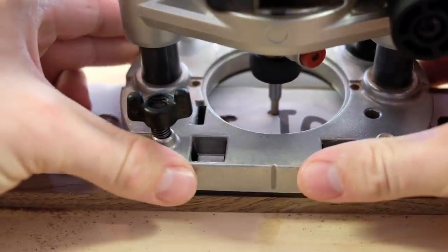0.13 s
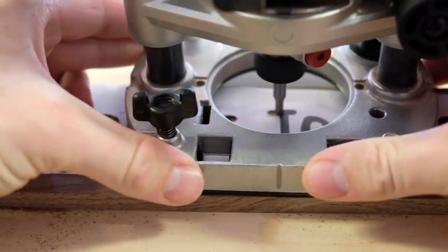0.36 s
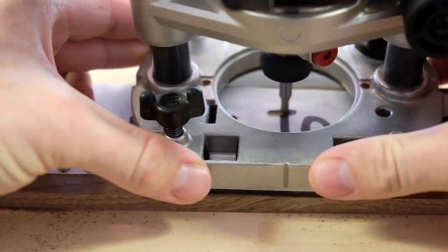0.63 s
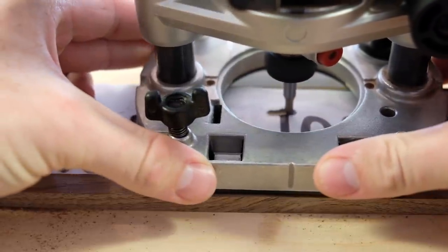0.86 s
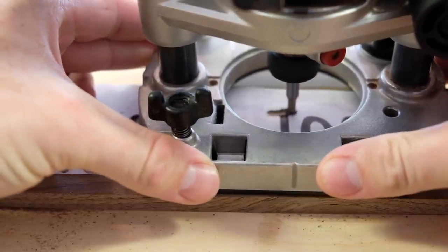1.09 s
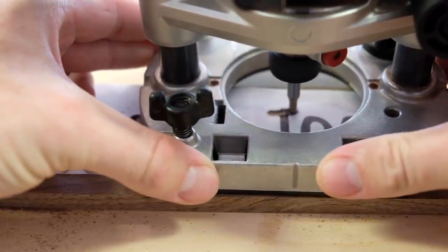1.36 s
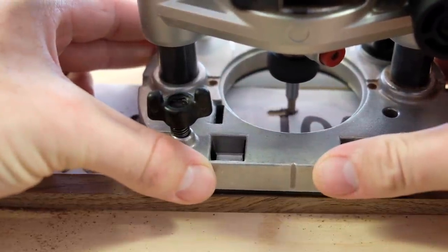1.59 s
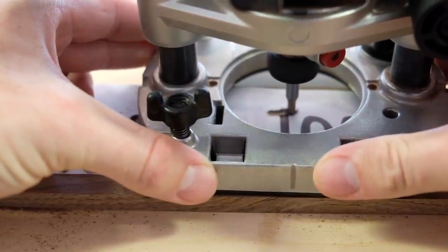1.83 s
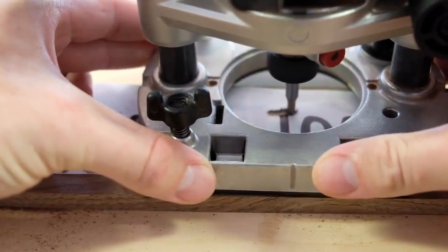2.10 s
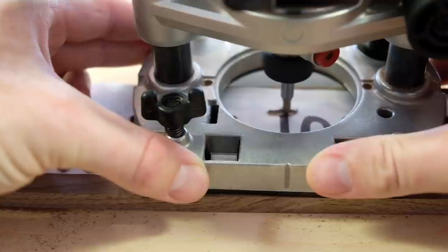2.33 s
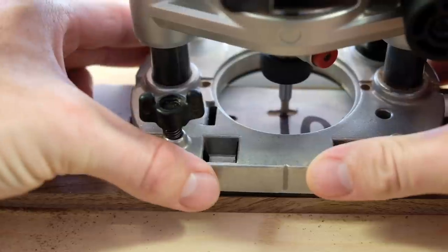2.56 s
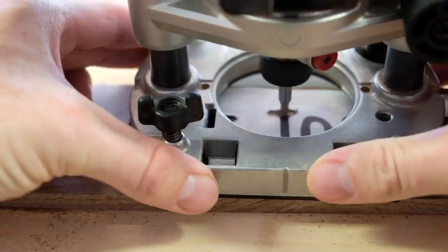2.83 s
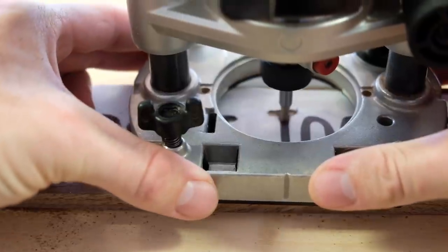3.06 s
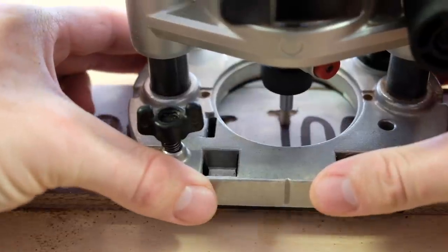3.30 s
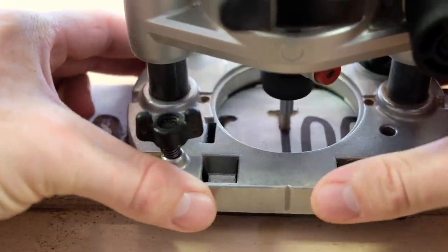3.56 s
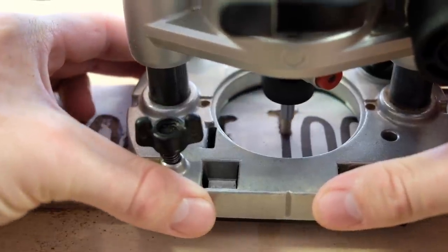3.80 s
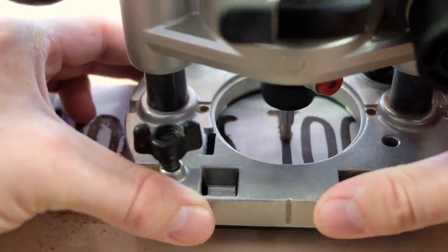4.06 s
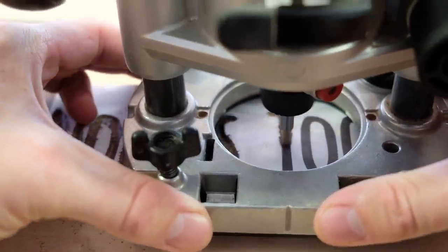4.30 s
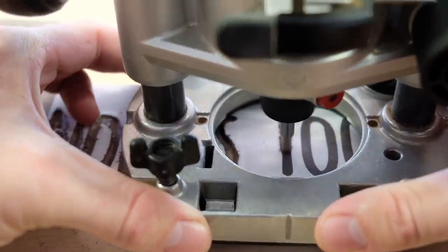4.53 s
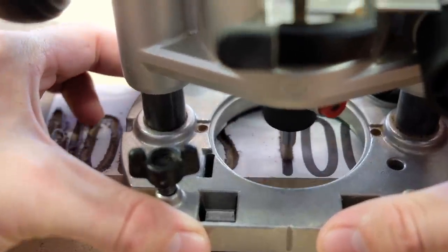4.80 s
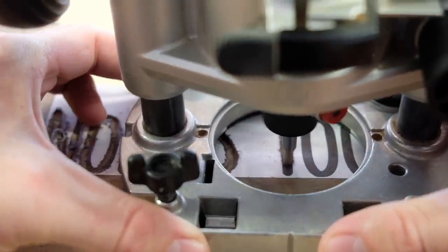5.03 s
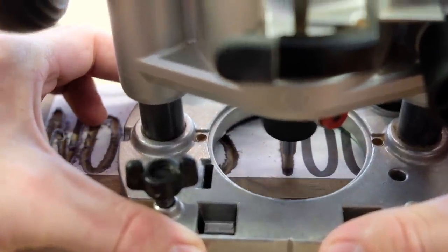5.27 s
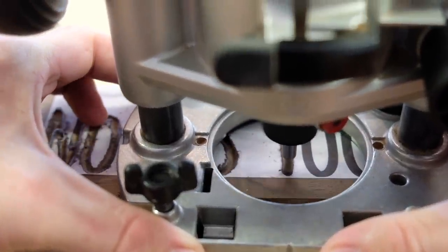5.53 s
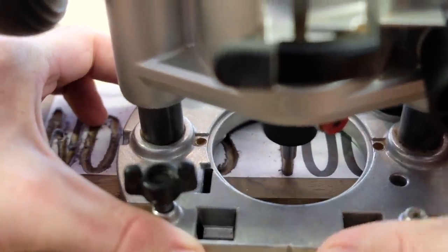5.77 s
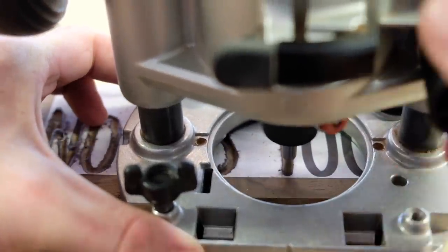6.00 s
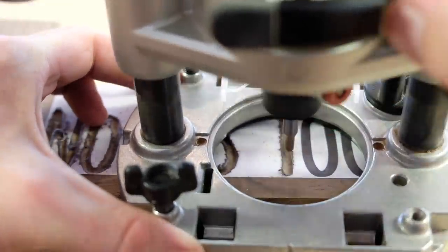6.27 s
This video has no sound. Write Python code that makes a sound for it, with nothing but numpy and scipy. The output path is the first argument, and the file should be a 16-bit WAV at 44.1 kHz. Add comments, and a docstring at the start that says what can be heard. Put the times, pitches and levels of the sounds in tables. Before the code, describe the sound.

High, buzzing electric router whine swells from near silence, holds a constant pitch with flickering rasp and airy hiss, then two dull bumps near the end.

```python
"""At a workbench, a small router carves letters into a board close to one microphone, fading in over a room hum.
The spinning shaft sings a stack of whole-number multiples of its speed, called orders.
A bearing and the mains add thin side tones; filtered noise makes the hiss of fan air and chips, puffing each turn.
The colour shifts as the tool slides along, and the bench shakes with a low rumble.
At the end the motor is lifted on its posts with two soft knocks, each a pair of dying sines."""
import sys
import numpy as np
from scipy import signal
from scipy.fft import irfft
from scipy.io import wavfile
from scipy.ndimage import uniform_filter1d

SR = 44100
rng = np.random.default_rng(int(sys.argv[2]) if len(sys.argv) > 2 else 0)


def volts_from_decibels(level):
    """Turn decibel levels (scalar or array-like) into linear amplitude factors."""
    exponent = np.asarray(level, float) / 20
    return 10 ** exponent


def dump_mix(stems):
    """Bounce the given channels to the path in sys.argv[1] as a 16-bit WAV at rate SR."""
    frames = np.atleast_2d(stems).T  # one column per channel
    limited = np.clip(frames, -1, 1)  # hard clip at full scale
    pcm = np.round(limited * 32767).astype(np.int16)
    wavfile.write(sys.argv[1], SR, pcm)


N = 281358  # length in samples
TIME = np.arange(N) / SR  # seconds


def evened(x):
    """Scales a signal to an rms of 1."""
    return x / np.sqrt(np.mean(abs(x) ** 2) + 1e-20)


def curve(rows, t):
    """Reads each column of a time table at times t, with straight lines between rows."""
    s, *columns = np.transpose(rows)
    return [np.interp(t, s, c) for c in columns]


def read(points, hz):
    """Reads a spectrum table at the frequencies hz, on a log-frequency axis."""
    f, value = np.transpose(points)
    return np.interp(np.log(hz + 1), np.log(f + 1), value)


def span(s, length, edge):
    """0 before, 1 during and 0 after a stretch of time, with soft edges."""
    to_nearest_end = np.minimum(TIME - s, s + length - TIME)
    return np.clip(to_nearest_end / edge + .5, 0, 1)


def wander(width_hz):
    """Slow random drift: low-passed complex noise of rms 1, drawn coarsely and interpolated."""
    step = 32  # samples between draws
    a, b = rng.standard_normal((2, N // step + 200))
    r = np.exp(-np.pi * abs(width_hz) * step / SR)
    smooth = signal.lfilter([1], [1, -r], a + 1j * b)
    z = evened(smooth[199:])  # skip the filter's start-up
    at = np.arange(len(z)) * step / SR
    return np.interp(TIME, at, z.real) + 1j * np.interp(TIME, at, z.imag)


def tone(turns, db, slow=.3, skirt=.3, firm_db=0):
    """A sine that drifts slowly and shivers fast, which gives it a noisy foot; firm_db lifts its clean core."""
    shape = volts_from_decibels(firm_db) + slow * wander(width_hz=19) + skirt * wander(width_hz=55)
    size = np.sqrt(2 / (1 + slow ** 2 + skirt ** 2))
    spin = np.exp(2j * np.pi * (turns + rng.random()))
    return size * volts_from_decibels(db) * (shape * spin).real


# Hums of the room. Each row: pitch in Hz, width in Hz, starting level in dB, fall in dB per second.
ROOM_HUM = [(115.7, 7, -72, 5), (495, 0.91, -71, 52), (39.6, 23, -75, 5), (300, 250, -84, 5),
            (900, 500, -77, 5)]


def room_tone():
    """A low hum and a quickly fading note near 495 Hz, made of wandering tones, that stop short."""
    end_s, fade_s = 0.23, 0.025
    hum = np.zeros(N)
    for hz, width_hz, db, fall_db in ROOM_HUM:
        spin = np.exp(2j * np.pi * hz * TIME)
        # a narrow tone is mostly steady, a wide one mostly drift
        drift = evened(12 / width_hz + wander(width_hz))
        hum += np.sqrt(2) * volts_from_decibels(db - fall_db * TIME) * (spin * drift).real
    return hum * np.clip((end_s - TIME) / fade_s, 0, 1)


# The shaft's orders. Each row: order, level in dB against the other router sounds,
# roughness (share of shiver around the line, scaled below).
ORDERS = [(1, -59.5, .1), (2, -63.5, .2), (3, -65, .25), (4, -59.5, .3), (5, -53.3, .32), (6, -59.5, .35),
          (7, -58, .4), (8, -60, .4), (9, -62.5, .6), (10, -63.5, .8), (11, -69, 1.2), (12, -67, .5),
          (13, -71, .6), (14, -75, .6), (15, -68.5, .5), (16, -68.5, .7), (17, -67, 1.6), (18, -65.5, 2.2),
          (19, -70, 2.3), (20, -73, 2.2), (21, -78, 1.5), (22, -77, 1.2), (23, -74, 1.6), (24, -65.5, .5)]
# The bit chatters and a group of orders flares or drops out at once.
# Each row: start in seconds, length in seconds, centre order, spread in orders, strength in dB before scaling.
CHATTER = [(0, .17, 17.9, 1, 13), (0.186, .06, 17.9, 1, 14), (0.296, .14, 17.9, 1, 12),
           (0.51, 0.25, 18.4, 1.1, 12.5), (.15, 0.96, 22, 1.6, 7), (0.874, 0.23, 17.3, 1.1, 13.5),
           (2.38, 0.33, 17.5, 1.2, 6), (2.678, 1.0, 18.3, 1.3, 9), (3.2, 0.083, 5.5, 1, -4),
           (3.211, 0.059, 11.5, 1.5, 8.5), (3.365, .08, 11, 1, 9), (3.386, 0.034, 5.5, 1, -9.5),
           (4.301, 1.2, 15.4, .7, 5), (5.42, .09, 20, 2.4, 8), (5.5, 0.28, 17.5, .8, 8),
           (5.53, 0.074, 12, 1.3, 9.5), (5.52, .2, 21.3, 1.8, 12), (5.88, .45, 14, .5, 9)]
# One order sings out or sinks into the hiss for a while.
# Each row: start in seconds, length in seconds, order, change in dB before scaling.
SWELLS = [(0.127, 1.18, 2, 4.5), (1.5, 0.27, 2, -17), (2.18, 0.18, 2, -11), (2.747, 0.96, 2, -7.5),
          (5.498, 0.86, 2, 3), (5.85, 0.27, 2, 3), (.3, 0.23, 3, 6), (.6, 0.67, 3, -15), (1.2, 2.8, 3, -2),
          (3.78, 1.42, 3, 7.5), (5.457, 0.27, 3, 7), (0, 1.32, 4, 3), (0.304, 0.53, 4, 2),
          (1.5, 0.11, 4, -6), (1.8, .6, 4, 0.5), (2.42, 0.31, 4, 3), (2.982, 0.46, 4, 4),
          (4.85, .65, 4, -8.5), (5.804, .3, 4, 3), (0.197, 0.18, 5, -25), (.68, 0.16, 5, -14),
          (1.066, 0.23, 5, 1.5), (1.355, 0.25, 5, -3.5), (1.813, 0.38, 5, -6), (2.18, 0.21, 5, 3),
          (2.42, 0.29, 5, -5), (3.11, .4, 5, 4.5), (4.837, 0.15, 5, -4), (4.994, 0.26, 5, 2),
          (5.25, 0.11, 5, -5), (5.37, .22, 5, 3.5), (5.882, 0.23, 5, -1), (1.05, 1.1, 6, -4),
          (1.8, .32, 6, -3), (2.4, .16, 6, -11), (2.76, 2.1, 6, 5), (3.1, 0.34, 6, 4), (4.983, 0.16, 6, 6),
          (5.747, .63, 6, -15), (0, 2.4, 7, -12), (2.406, 0.77, 7, -2.5), (3.143, .25, 7, 3.5),
          (3.736, 2.0, 7, 3.5), (4.148, 0.8, 7, 2), (5.2, .17, 7, -4), (5.746, .13, 7, -12),
          (5.88, 0.12, 7, 3.5), (.15, 1.09, 8, -7), (2.25, 0.42, 8, -2), (4.95, 1.1, 8, 1.5),
          (5.85, .3, 8, 3.5), (.3, 0.77, 9, 4.5), (3.9, 0.6, 9, -5), (5.72, .6, 9, 3.5), (.6, 0.2, 10, 6),
          (3.15, .75, 10, 4), (4.65, .8, 10, -3), (4.35, 1, 12, 0), (4.35, 0.86, 13, 6),
          (1.35, 0.38, 17, 1), (3.45, 0.44, 17, -8), (4.95, 1.0, 24, -5), (5.3, .6, 16, 0)]
# The bit twists and slips against the shaft. Each row: time in seconds, mean slip in Hz, rms wobble in Hz,
# both per order, and reduced for orders of roughness under 1.
SLIP = [(0, -0.701, .5), (.8, -0.498, 0.49), (.88, -0.033, .15), (1.2, -0.003, 0.26), (2.3, -.3, 1),
        (3.7, -.3, 0.92), (3.9, 0, 0.4), (5.36, 0, 0.53), (5.42, -0.91, 0.81), (5.66, -0.88, .7),
        (5.72, -0.014, 0.44), (6.38, 0.022, 0.36)]
# Orders that stay with the shaft and do not slip: a plain list of order numbers.
ARMATURE_ORDERS = (1, 12, 15, 16, 24)


def orders(turns):
    """Shaft orders: high ones flutter together, chatter makes them ring firm, rough ones follow the slipping bit."""
    # slow level changes in dB, one line per order; later scaled for loudness and for the clean core
    load_db = np.zeros((len(ORDERS) + 1, N))
    for s, length, order, db in SWELLS:
        load_db[round(order)] += db * span(s, length, edge=0.023)
    # the bit leaves the wood at 6.08 s and orders 4 to 8 fall away over 0.12 s
    load_db[4:9] += -15 * np.clip((TIME - 6.08) / 0.12, 0, 1)
    # orders 2 to 8 waver each on their own, 9 to 23 flutter together
    load_db[2:9] += [1.27 * wander(width_hz=2.8).real for _ in range(2, 9)]
    load_db[9:24] += 2.3 * wander(width_hz=8.2).real

    slip_hz, wobble_hz = curve(SLIP, TIME)
    wobble = wobble_hz * np.sqrt(2) * wander(width_hz=25.2).real
    lag = np.cumsum(slip_hz + wobble) / SR  # in turns

    flares = [signal.windows.tukey(round(length * SR), .15) for _, length, *_ in CHATTER]
    out = np.zeros(N)
    for k, (_, db, rough) in enumerate(ORDERS, 1):
        flare_db = np.zeros(N)
        for (s, _, centre, spread, lift_db), flare in zip(CHATTER, flares):
            nearness = np.exp(-((k - centre) / spread) ** 2 / 2)
            flare_db[round(s * SR):][:len(flare)] += lift_db * nearness * flare
        slips = k not in ARMATURE_ORDERS
        order_turns = k * (turns + slips * min(rough, 1) * lag)
        level_db = db + 0.62 * load_db[k] + 0.57 * flare_db
        firm_db = 0.77 * flare_db + .45 * load_db[k]
        slow = (.3 if k <= 8 else .6) * rough
        out += tone(order_turns, level_db, slow, 0.88 * rough, firm_db)
    return out


# Bearing tones: alone, doubled or tripled, and beating with the shaft. Each row: times the bearing,
# times the shaft, level in dB against the other router sounds, dB gained along the stroke.
BEARING = [(1, 0, -61.5, -4), (1, 2, -70.5, 2), (1, 3, -67, 6), (1, 4, -71, 0), (2, 0, -66, -2),
           (2, 2, -72, 0), (3, 0, -76, 0)]
# Mains pulses split the armature slot tones.
# Each row: shaft order, offset in Hz, level in dB against the other router sounds.
SLOT_SIDES = [(12, -720, -68), (12, -480, -67), (12, -240, -69), (12, 240, -74), (24, -480, -78),
              (24, -240, -79)]
# How the tool is held, for the bearing and the hiss.
# Each row: time in seconds, way along the stroke from 0 to 1, lift from 0 to 1.
POSE = [(0, 0.8, 0.2), (1, 0.64, 0.06), (2.4, 0, 0.3), (3.2, 0.8, 0.05), (3.6, 0.8, 0.02), (4.6, 1, 0.13),
        (5.7, 1, 0.37), (5.85, 1, 0.36), (6.1, .9, 0.86), (6.38, .9, 1)]


def side_tones(turns):
    """Bearing and mains lines, thin tones that are locked to the shaft or offset from it."""
    bearing_per_turn = 4.098
    way = curve(POSE, TIME)[0]
    out = np.zeros(N)
    for m, n, db, gain_db in BEARING:
        out += tone((m * bearing_per_turn + n) * turns, db + gain_db * way, 0.86, 0.17)
    for k, hz, db in SLOT_SIDES:
        out += tone(k * turns + hz * TIME, db, 1.0, 0.1)
    return out


# Colour of the air and chip noise; only the shape counts.
# Each row: pitch in Hz, dB early in the stroke, dB late in the stroke, dB when lifted.
HISS = [(150, -29, -30, -26), (320, -27, -27, -23), (570, -22.5, -22.5, -19), (800, -8.5, -12.5, -10),
        (1150, -12.5, -13.5, -12), (1700, -3.5, -5.5, -2), (2250, -1, -4, -2), (3500, -4.5, -4, -3),
        (4250, -8.5, -11, -7), (5500, -10.5, -9.5, -5), (6200, -6.5, -8, -4), (7400, -8.5, -14, -13),
        (8800, -21, -16, -13), (10100, -10, -14, -11), (12000, -13.3, -13.5, -14),
        (13800, -14, -15.5, -14.5), (15700, -13.5, -14, -13.5)]
# Cavity of the base plate over the board: peaks and echo dips that fade on lifting.
# Each row: pitch in Hz, width in Hz, height in dB.
CAVITY = [(1900, 77, 2.5), (2500, 150, 3), (2850, 85, -10.5), (3206, 154, 6), (4740, 220, -2.5),
          (5180, 59, 7.5), (6520, 290, 2.5)]
# A treble echo dip opens as the motor rises and slides down in pitch.
# Each row: time in seconds, pitch in Hz, depth in dB.
HOLLOW = [(5.68, 13700, 0), (5.76, 13500, -6), (6.05, 13500, -7), (6.2, 13200, -7), (6.38, 12800, -7)]


def hiss(turns):
    """Fan air and chips: noise coloured by the pose, the treble puffing once and twice a turn."""
    # the noise is built as a spectrogram, one frame every 256 samples
    frames, hz = N // 256 + 5, np.fft.rfftfreq(1024, 1 / SR)
    a, b, patches = rng.standard_normal((frames, 513, 3)).T
    t = np.arange(frames) * 256 / SR
    hz_column = hz[:, None]

    way, lift = np.clip(curve(POSE, t), 0, 1)
    f, *columns = np.transpose(HISS)
    early, late, lifted = (read(np.c_[f, c], hz)[:, None] for c in columns)
    cavity = sum(db * np.exp(-((hz - f) / w) ** 2 / 2) for f, w, db in CAVITY)[:, None]
    on_board = (1 - way) * early + way * late + cavity
    colour_db = (1 - lift) * on_board + lift * lifted
    hollow_hz, hollow_db = curve(HOLLOW, t)
    colour_db += hollow_db * np.exp(-((hz_column - hollow_hz) / 420) ** 2 / 2)

    # uneven patches over pitch and time, and gusts that grow towards the treble
    patches = evened(uniform_filter1d(uniform_filter1d(patches, 40, 0), 16, 1))
    gusts = evened(uniform_filter1d(rng.standard_normal(frames), 14))
    gusts_db = .7 * gusts * np.clip(hz_column / 9000, 0, 1)
    z = (a + 1j * b) * volts_from_decibels(colour_db + .6 * patches + gusts_db)
    z *= np.clip(hz_column / 130, 0, 1) ** 2  # thin out the bass
    air = evened(signal.istft(z, nperseg=1024, noverlap=768)[1][:N])

    high_pass = signal.butter(2, 4000, "high", fs=SR, output="sos")
    treble = signal.sosfilt(high_pass, air)
    puff = .33 * np.cos(2 * np.pi * turns) + .15 * np.cos(4 * np.pi * turns)
    return volts_from_decibels(-46.0) * (air + puff * treble)


# Colour of the low shaking; only the shape counts. Each row: pitch in Hz, level in dB.
RUMBLE = [(10, -11), (22, -5.5), (45, -14.5), (90, -18.5), (150, -24.5), (300, -36)]
# The hands nudge the tool and the bench shakes.
# Each row: start in seconds, length in seconds, dB above the steady shaking.
BUMPS = [(.97, 0.28, 7), (1.45, 0.48, 8), (2.52, .14, 8), (2.695, .1, 8), (2.88, .18, 11), (3.22, 0.22, 8),
         (3.55, .6, 8.5), (3.92, 0.11, 5), (4.92, .15, 8), (5.08, 0.1, 13), (5.25, .7, 4), (6.255, .12, 14)]
# Loudness of the whole router, which the rumble follows too. Each row: time in seconds, rms level in dB.
FADE = [(0.0, -65.5), (0.41, -53), (0.78, -46.5), (1.17, -42.5), (3.43, -43), (3.64, -42), (4.55, -43),
        (6.38, -43)]


def rumble():
    """Lumpy low shaking of the bench: bass noise that swells at each bump."""
    steady_db = -41  # against the router
    a, b = rng.standard_normal((2, N // 2 + 1))
    colour_db = read(RUMBLE, np.fft.rfftfreq(N, 1 / SR))
    low = irfft((a + 1j * b) * volts_from_decibels(colour_db), N)
    bump_db = sum(db * span(s, length, edge=0.068) for s, length, db in BUMPS)
    return volts_from_decibels(curve(FADE, TIME)[0] + steady_db + bump_db) * evened(low)


# Soft bumps of the motor on its posts.
# Each row: start in seconds, level in dB of the main sine before its rise and decay, pitch in Hz.
KNOCKS = [(6.207, -60, 258), (6.246, -55, 260)]


def knocks():
    """The motor slides up its posts and bumps dully: two sines that rise quickly and die away."""
    decay_s, rise_s = 0.091, 0.0024  # time to fall 60 dB, time constant of the rise
    out, t = np.zeros(N), np.arange(3000) / SR
    for s, db, hz in KNOCKS:
        ring = np.sin(2 * np.pi * hz * t) + .6 * np.sin(2 * np.pi * 0.74 * hz * t)
        rise = 1 - np.exp(-t / rise_s)
        out[round(s * SR):][:len(t)] += volts_from_decibels(db - 60 * t / decay_s) * rise * ring
    return out


# Speed of the shaft. Each row: time in seconds, turns per second in Hz.
SHAFT = [(0, 649.25), (1.0, 649.25), (1.6, 649.4), (2.3, 649.35), (3.0, 649.15), (4.5, 649.1), (5.3, 649.2),
         (6.0, 649.4), (6.38, 649.35)]


def scene():
    """Adds up all the sounds at one microphone, the same on both sides."""
    turns = np.cumsum(curve(SHAFT, TIME)[0]) / SR
    router = orders(turns) + side_tones(turns) + hiss(turns)
    faded_router = evened(router) * volts_from_decibels(curve(FADE, TIME)[0])
    mono = faded_router + rumble() + knocks() + room_tone()
    return np.array([mono, mono])


def top_cut(x):
    """Nothing passes above the cut-off."""
    return signal.sosfilt(signal.butter(12, 16510, fs=SR, output="sos"), x)


def record(dry):
    """Cuts the sound off steeply above 15760 Hz and returns the finished mix."""
    low_pass = signal.firwin(2047, 15760, window=("kaiser", 9), fs=SR)
    mix = signal.oaconvolve(dry, low_pass[None], "same")
    return top_cut(mix)


dry = scene()
out = record(dry)
dump_mix(out)
```